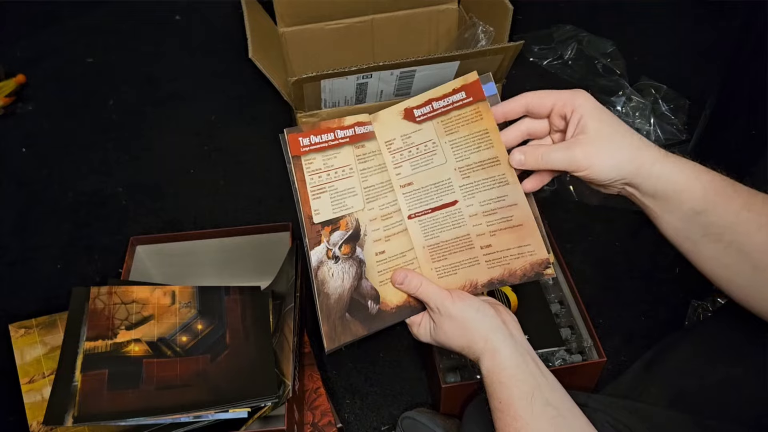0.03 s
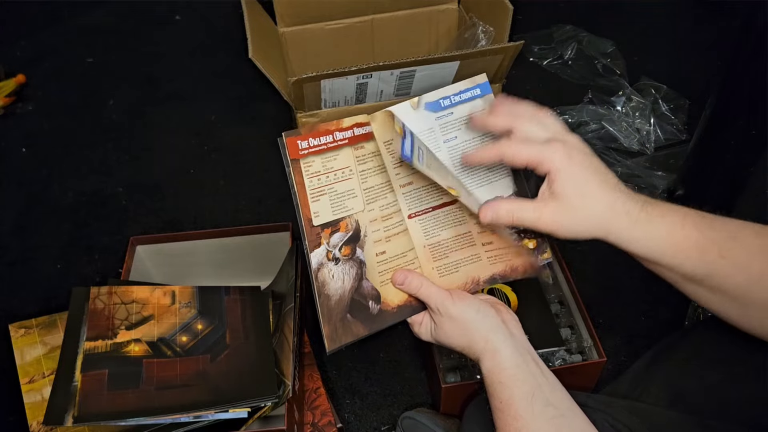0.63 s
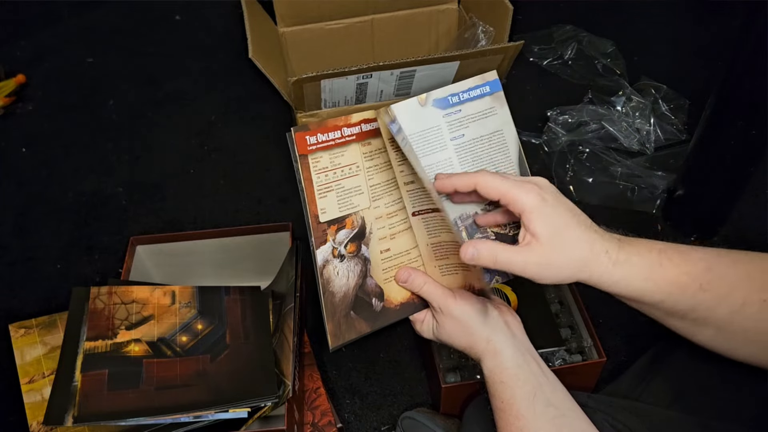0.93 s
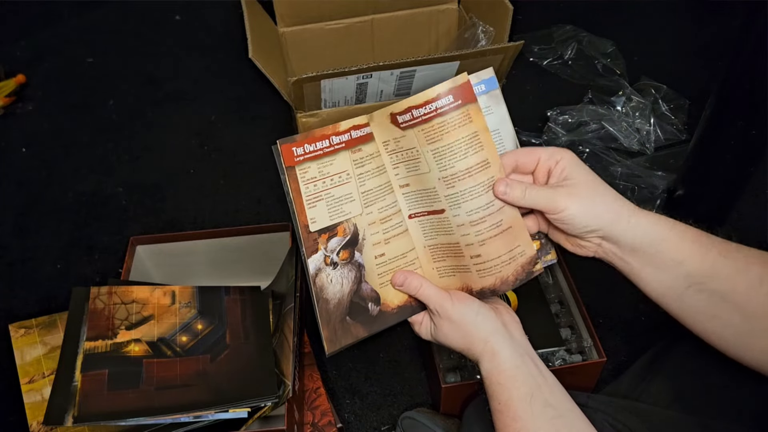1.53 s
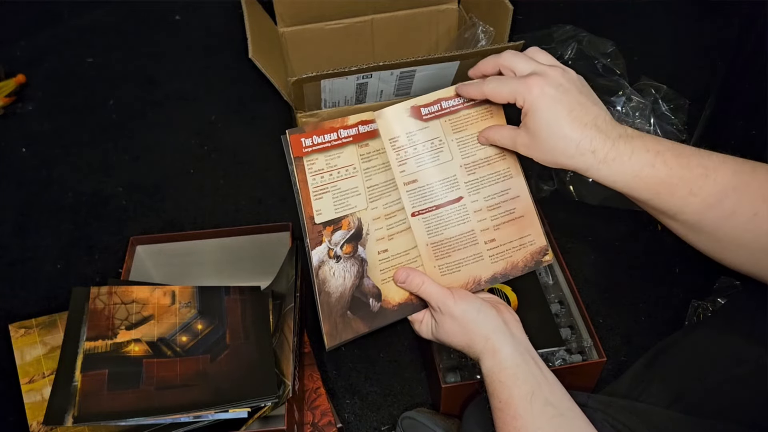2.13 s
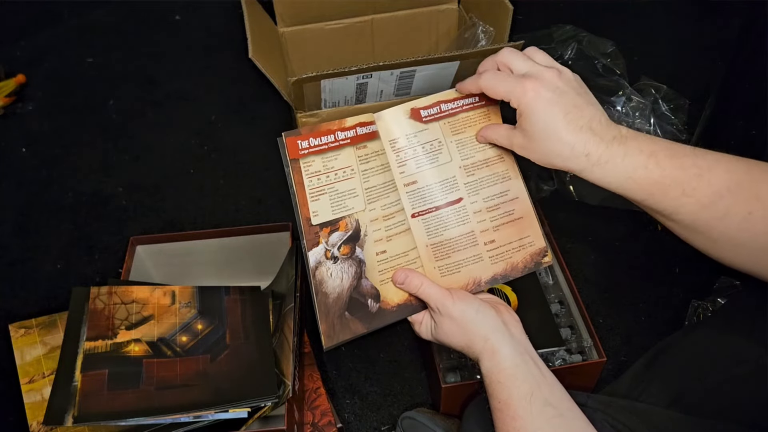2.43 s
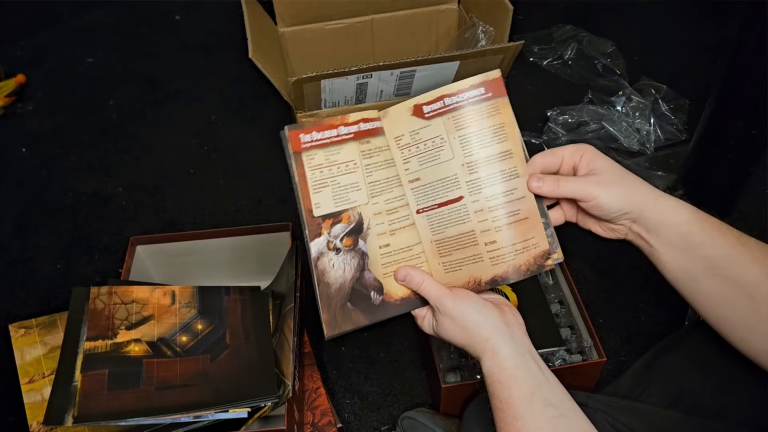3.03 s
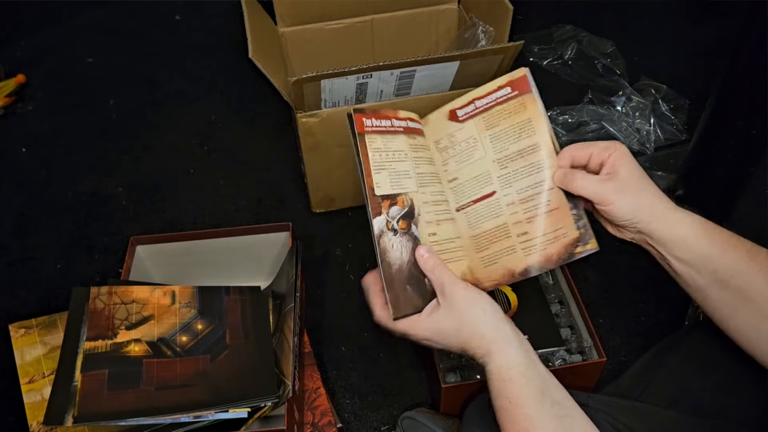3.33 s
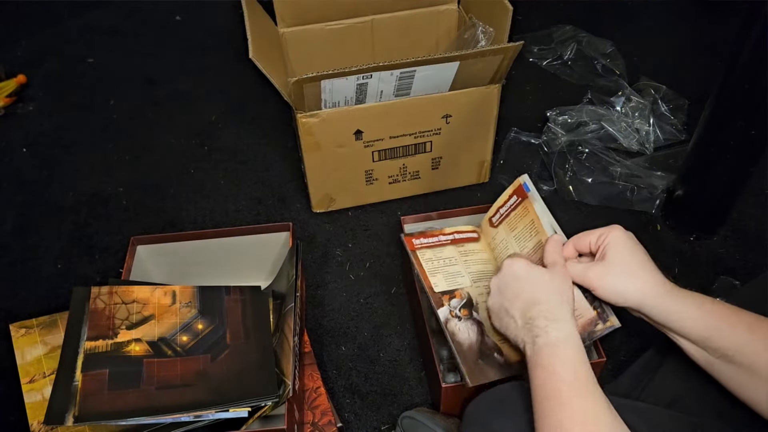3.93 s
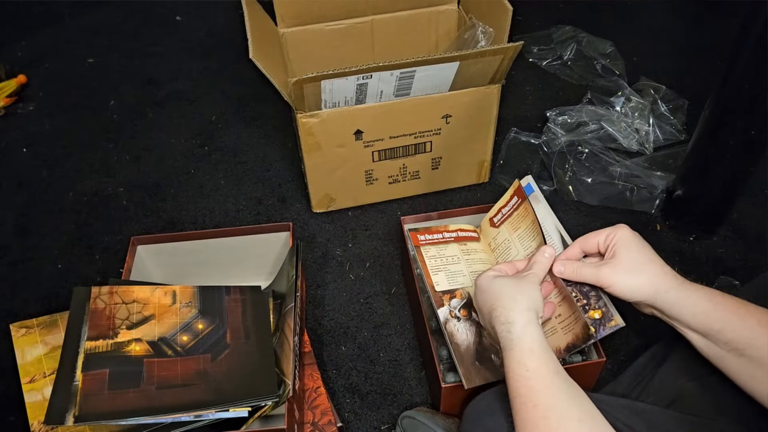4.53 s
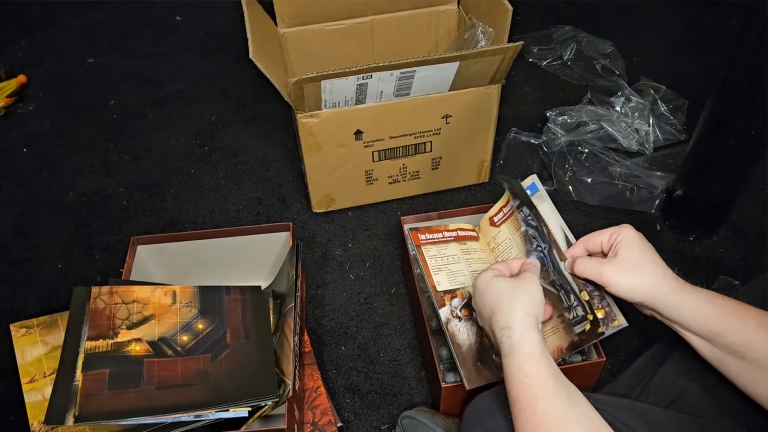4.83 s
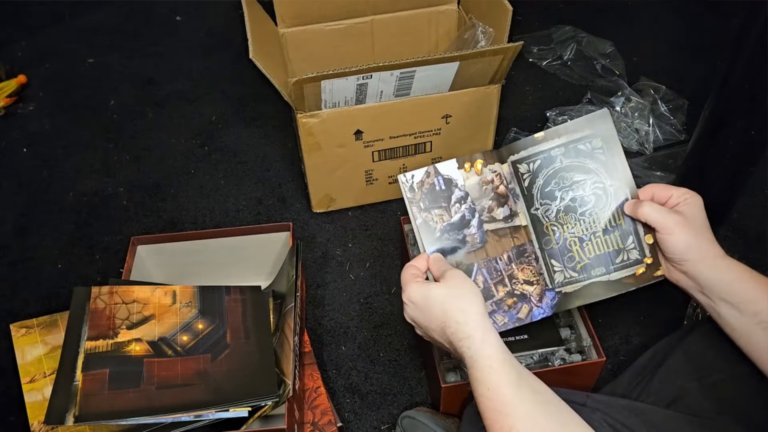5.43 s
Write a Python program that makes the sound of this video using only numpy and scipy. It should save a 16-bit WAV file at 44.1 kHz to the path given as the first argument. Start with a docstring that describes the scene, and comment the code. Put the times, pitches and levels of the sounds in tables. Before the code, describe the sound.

A low fan hum with a faint rush runs throughout in a small, quiet room. Close by, hands leaf through a glossy booklet. Soft rustles and finger slides begin at about 0.3 seconds, with a brighter crackle and a light knock near 0.8 seconds. More paper scrapes and brief swishes follow from 1.5 to 2.4 seconds, with small ticks as a fingertip catches a page corner. From about 2.8 to 3.5 seconds a thumb rubs dryly across the pages, with a few light taps. At 4 seconds the booklet bumps onto a box with a short, hollow double thud, slightly to the right. The paper rustles again, and at about 5.1 seconds a page flicks over with a sharp snap, the crispest sound of all. A few softer flaps and a small tick follow until about 5.6 seconds.

```python
"""Leafing through a booklet

A paperback booklet is leafed through over an open game box in a small quiet room. Fingers slide on
the glossy sheets, pages bend and crackle, the book bumps down and sets the box booming, and one page
flicks over sharply. Behind it a fan motor hums and beats slowly against the mains."""
import sys
import numpy as np
from scipy import signal
from scipy.fft import rfft, irfft, next_fast_len
from scipy.io import wavfile
from scipy.ndimage import map_coordinates

SR = 44100
rng = np.random.default_rng(int(sys.argv[2]) if len(sys.argv) > 2 else 0)


def generate_wav(signal):
    """Clip the signal to [-1, 1] and save it as 16-bit WAV at the path in sys.argv[1]."""
    frames = np.transpose(np.atleast_2d(signal))
    scaled = np.clip(frames, -1, 1) * 32767
    pcm = np.round(scaled).astype(np.int16)
    wavfile.write(sys.argv[1], SR, pcm)


N = 251087
TIME = np.arange(N) / SR


def from_db(db):
    return 10 ** (np.asarray(db) / 20)


def unit_rms(x):
    return x / np.sqrt(np.mean(x ** 2) + 1e-20)


def at_hz(points, hz):
    """Table lookup on a log-frequency axis."""
    known_hz, values = np.transpose(points)
    return np.interp(np.log(hz + 1), np.log(known_hz), values)


def butter(x, hz, kind, order=2):
    sos = signal.butter(order, np.clip(hz, 10, .45 * SR), kind, fs=SR, output="sos")
    return signal.sosfilt(sos, x)


def add(track, time_s, sound):
    start = round(time_s * SR)
    track[..., start:start + sound.shape[-1]] += sound[..., :N - start]


def stereo(pair, correlation):
    """Two independent signals mixed to a correlated left and right."""
    correlation = np.clip(correlation, -.99, .99)
    mid = np.sqrt(1 + correlation) * pair[0]
    side = np.sqrt(1 - correlation) * pair[1]
    return np.array([mid + side, mid - side])


def coloured(pair, spectrum):
    """Stereo signal shaped by a spectrum; unit rms."""
    size = next_fast_len(N)
    gain = from_db(at_hz(spectrum, np.fft.rfftfreq(size, 1 / SR)))
    return unit_rms(irfft(rfft(pair, size) * gain, size)[:, :N])


def drift(rate_hz):
    """Random line through unit-variance knots."""
    knots = rng.standard_normal(2000)
    return np.interp(TIME * rate_hz, np.arange(len(knots)), knots)


# fan off to the right: (frequency [Hz], left-right correlation [-1..1])
FAN_CORRELATION = [(60, 0.81), (130, 0.71), (290, 0.74), (640, 0.067), (1350, -0.75), (2400, 0.58),
                   (4400, -0.16), (15000, -0.37)]
def fan_stereo_noise(size):
    """White noise with the left-right correlation of a fan off to the right; also the room's tail."""
    correlation = at_hz(FAN_CORRELATION, np.fft.rfftfreq(size, 1 / SR))
    spectra = rfft(rng.standard_normal((2, size)))
    return unit_rms(irfft(stereo(spectra, correlation), size))


# motor hum: (shaft harmonic [1], rms level [dB])
MOTOR_HARMONICS = [(1, -68), (2, -53.5), (3, -53.5), (4, -68), (5, -62.5), (6, -66)]
# fan rush and hiss spectra: (frequency [Hz], relative level [dB])
RUSH_SPECTRUM = [(20, -37), (45, -14.5), (80, -8), (101, -3), (125, -0.5), (160, -4), (205, -1),
                 (225, -6.5), (255, -9), (285, -7), (315, -7.5), (345, -5), (430, -11), (480, -9),
                 (545, -4), (590, -10.5), (640, -8.5), (720, -13.5), (790, -7), (830, -19), (1050, -15),
                 (1700, -24)]
HISS_SPECTRUM = [(900, 15.5), (1500, 14), (2250, 17), (3200, -14), (4200, -9), (4600, 14.5), (5100, -6.5),
                 (6500, -3.5), (7200, 7), (8500, 4.5), (9500, -72), (16000, -53)]
def fan(shaft_hz, mains_hz, mains_db, rush_db, hiss_db, waver_db):
    """Rush, hiss and hum. The motor slips just behind the mains, so their second harmonics beat."""
    rad_per_hz = 2 * np.pi * (TIME - .01)
    hum = from_db(mains_db + 1.2 * drift(5)) * np.cos(2 * mains_hz * rad_per_hz)
    for harmonic, db in MOTOR_HARMONICS:
        wobble_rad = .05 * harmonic * drift(7)
        level = from_db(db + waver_db * drift(8.1))
        hum += level * np.cos(harmonic * shaft_hz * rad_per_hz + wobble_rad)
    rush = from_db(rush_db) * butter(coloured(fan_stereo_noise(N), RUSH_SPECTRUM), 1650, "low")
    hiss = from_db(hiss_db) * butter(coloured(fan_stereo_noise(N), HISS_SPECTRUM), 640, "high")
    return np.sqrt(2) * hum + rush + hiss


def hand_speed(peak_s, length_s):
    """A hand speeds up, holds briefly and slows down; 0 to 1."""
    flank_s = length_s * np.where(TIME < peak_s, 0.67, 0.69)
    distance = abs(TIME - peak_s) / flank_s
    return np.exp(-np.minimum(distance ** 2.6, 20))


def friction(spectrum, slips_per_s, spread_db, hiss, correlation):
    """Tiny random slips over an even hiss; unit rms."""
    slipping = rng.random(N) < slips_per_s / SR
    sizes = from_db(spread_db * np.minimum(rng.exponential(1, N), 4))
    noise = (unit_rms(slipping * sizes) + hiss) * rng.standard_normal((2, N))
    return coloured(stereo(noise, correlation), spectrum)


# hand strokes: (peak time [s], length [s], paper on paper [dB], skin on gloss [dB], flex re paper [dB])
STROKES = [(0.35, 0.11, -67.5, -78, -10), (0.582, 0.096, -62.5, -80, -13), (0.824, 0.1, -57, -68, -9),
           (0.96, 0.21, -65.5, -78.5, -9), (1.222, 0.096, -65.5, -79.5, -4),
           (1.595, 0.15, -61.5, -79, -0.5), (1.72, 0.067, -54, -63, -5), (1.878, 0.19, -61.5, -64.5, -16),
           (2.033, 0.17, -64.5, -85, -2.5), (2.245, 0.042, -60, -69, 0.5), (2.392, 0.16, -65, -79, -20),
           (2.827, 0.098, -58, -69.5, -11), (2.989, 0.18, -58.5, -65.5, -10), (3.303, 0.074, -64, -77, 1.5),
           (3.438, 0.073, -64.5, -57, -9), (3.527, 0.064, -72, -61, -3), (4.059, 0.12, -57, -64.5, 1.5),
           (4.25, 0.16, -62, -76.5, -6), (4.63, 0.03, -59.5, -69.5, -14), (4.978, 0.097, -56.5, -63, -0.5),
           (5.158, 0.13, -61, -64, 1), (5.322, 0.1, -63, -71, 2), (5.616, 0.096, -69.5, -75, 5)]
# bending sheet, scraping edge and sliding skin spectra: (frequency [Hz], relative level [dB])
RUSTLE_SPECTRUM = [(400, -3), (900, 1.5), (1400, 4), (2400, -6), (3500, -4), (6000, -15.5), (12000, -54)]
SCRAPE_SPECTRUM = [(1000, -19), (2200, 4.5), (3300, -1.5), (4200, 0), (5400, 2), (7500, -2), (9000, -2),
                   (11000, -87), (15000, -20)]
SLIDE_SPECTRUM = [(700, -25), (1500, -11), (3000, -4.5), (5500, -0.5), (8600, 1.5), (10000, -7),
                  (12000, 0.5), (15500, -4.5)]
def pages(rustle_gain_db, scrape_gain_db, slide_gain_db):
    """With each stroke, bending sheets rustle, their edges scrape and skin hisses over the gloss."""
    bend = paper = from_db(-70.5)   # floor: the book just being held
    skin = from_db(-89)
    for peak_s, length_s, paper_db, skin_db, flex_db in STROKES:
        speed = hand_speed(peak_s, length_s)
        bend = np.hypot(bend, from_db(paper_db + flex_db) * speed)
        paper = np.hypot(paper, from_db(paper_db) * speed)
        skin = np.hypot(skin, from_db(skin_db) * speed)
    rustle = friction(RUSTLE_SPECTRUM, slips_per_s=1500, spread_db=2, hiss=0.97, correlation=0.069)
    scrape = friction(SCRAPE_SPECTRUM, slips_per_s=600, spread_db=0, hiss=2.1, correlation=0.24)
    slide = friction(SLIDE_SPECTRUM, slips_per_s=3500, spread_db=1.5, hiss=1, correlation=0.083)
    rustle *= bend * from_db(rustle_gain_db + 3 * drift(50))
    scrape *= paper * from_db(scrape_gain_db + 3 * drift(70))
    slide *= skin * from_db(slide_gain_db + 1.9 * drift(41))
    return rustle + scrape + slide


# fingertip along an edge: (peak time [s], length [s], level [dB], pitch [Hz])
SWISHES = [(0.324, .03, -67, 2800), (0.821, .03, -65, 5260), (1.588, 0.032, -63, 3300),
           (1.706, 0.045, -60.5, 6170), (2.38, .025, -61, 5310), (2.824, .05, -64, 5500)]
def edge_swishes(width_hz, sink_oct_per_s):
    """A fingertip runs along an edge: a narrow hiss that sinks as more of the sheet comes free."""
    glides = [(peak_s + dt, hz * 2 ** (-sink_oct_per_s * dt))
              for peak_s, length_s, _, hz in SWISHES for dt in (-length_s, length_s)]
    centre_hz = np.interp(TIME, *np.transpose(glides))
    carrier = np.sqrt(2) * np.sin(2 * np.pi * np.cumsum(centre_hz) / SR)
    level = sum(from_db(db) * hand_speed(peak_s, length_s) for peak_s, length_s, db, _ in SWISHES)
    noise = stereo(rng.standard_normal((2, N)), 0.24)
    return level * unit_rms(butter(noise, width_hz / 2, "low")) * carrier


def fibre_crack(rise_s, shiver_s, low_hz, high_hz, correlation):
    """Fibres crack within one band, then the sheet shivers briefly; unit energy."""
    t = TIME[:2048]
    envelope = t / rise_s * np.exp(1 - t / rise_s) + from_db(-13) * np.exp(-t / shiver_s)
    crack = stereo(rng.standard_normal((2, len(t))), correlation) * envelope
    crack[:, round(rise_s * SR)] += from_db(18.5)   # one sharp break at the peak
    crack = butter(crack, [low_hz, high_hz], "band")
    crack = butter(crack, np.sqrt(low_hz * high_hz), "low", order=1)
    return crack / np.sqrt(np.sum(crack ** 2, axis=1, keepdims=True))


# book position, centre to right: (time [s], left channel lag [samples])
BOOK_POSITION = [(0, 0), (3.4, 0), (4, 1.2), (5.11, 1.2), (5.13, 2.2)]
def snap(time_s, rise_s, resonances, shiver_s, correlation, tilt_db_per_oct=0):
    """One crack per paper resonance, heard from where the book is."""
    out = 0
    for hz, width_oct, db in resonances:
        edge_ratio = 2 ** (np.clip(width_oct, .2, 3) / 2)
        level = from_db(db + tilt_db_per_oct * np.log2(hz / 5000))
        out = out + level * fibre_crack(rise_s, shiver_s, hz / edge_ratio, hz * edge_ratio, correlation)
    left, right = out
    lag_samples = np.interp(time_s, *np.transpose(BOOK_POSITION))
    return np.array([map_coordinates(left, [np.arange(len(left)) - lag_samples], order=5), right])


# sheet resonances: (centre [Hz], width [oct], level [dB])
SHEET_RESONANCES = [(670, 3.3, -13), (1540, 0.49, -11.5), (2780, 0.68, -2), (5630, 0.74, -0.5),
                    (8000, 0.31, -2), (12500, 0.27, -7), (15100, 0.24, -14)]
# sheet buckling: (time [s], relative level [dB], rise [s], tilt [dB/oct])
BUCKLES = [(0.36, -41.5, 0.002, -3.5), (3.3865, -37, 0.0009, -4), (3.5433, -40.5, 0.0037, 3),
           (5.005, -31, 0.007, -5), (5.022, -49, 0.0017, -2), (5.1095, -21, 0.00029, 1),
           (5.113, -29, 0.00033, 1), (5.1168, -37, 0.00061, -6.5), (5.1315, -15.5, 0.0011, 1),
           (5.1336, -10, 0.00053, 1), (5.138, -28, 0.0023, -4.5), (5.1435, -23, 0.00049, 4),
           (5.225, -34.5, 0.0021, -3), (5.306, -39, 0.0064, -5), (5.3151, -35.5, 0.0028, -5.5),
           (5.351, -44.5, 0.0054, -11), (5.492, -52.5, 0.00068, 7), (5.598, -32, 0.00062, 7.5)]
def sheet_buckles():
    """A sheet buckles over a wide band: fast in a crack, slowly in a flap."""
    out = np.zeros((2, N))
    for time_s, db, rise_s, tilt in BUCKLES:
        crack = snap(time_s, rise_s, SHEET_RESONANCES, shiver_s=.005, correlation=.5, tilt_db_per_oct=tilt)
        add(out, time_s, from_db(db) * crack)
    return out


# free corner resonances: (centre [Hz], width [oct], level [dB])
CORNER_RESONANCES = [(2000, 0.22, -7), (3530, 0.25, 0), (5150, 0.22, -8), (8400, 0.48, -17.5)]
# fingertip on a corner: (time [s], relative level [dB], rise [s], pitch [ratio])
CATCHES = [(0.394, -45.5, .001, 0.92), (0.5502, -42, 0.003, 0.93), (0.833, -34, .0005, 1.27),
           (0.8503, -34.5, 0.00052, 0.92), (0.8568, -41, 0.001, 1.05), (2.0703, -42.5, 0.0023, 0.92),
           (2.2426, -29, 0.00048, 0.99), (2.3834, -36, .0003, 1.03), (2.3877, -44, 0.00054, 0.94),
           (5.1266, -29, 0.00031, 1.64)]
def corner_ticks():
    """A fingertip catches a thin free corner; a shorter corner ticks higher."""
    out = np.zeros((2, N))
    for time_s, db, rise_s, pitch in CATCHES:
        corner = [(hz * pitch, width_oct, band_db) for hz, width_oct, band_db in CORNER_RESONANCES]
        add(out, time_s, from_db(db) * snap(time_s, rise_s, corner, shiver_s=.002, correlation=.5))
    return out


# thumb drags: (peak time [s], length [s], level [dB])
DRAGS = [(0.827, 0.022, -54.5), (1.857, 0.026, -60.5), (2.95, 0.035, -67), (3.09, .09, -62),
         (3.207, .04, -61), (3.265, 0.032, -59), (3.42, 0.032, -56), (3.952, 0.016, -58.5)]
# rubbed stack spectrum: (frequency [Hz], relative level [dB])
DRAG_SPECTRUM = [(600, -35), (1000, -2), (1450, 7), (1750, -3), (2100, -3), (2800, -9), (6000, -44)]
def thumb_drags():
    """The thumb sticks and slips across the stack of pages: a dry, hollow rub."""
    pressure = sum(from_db(db) * hand_speed(peak_s, length_s) for peak_s, length_s, db in DRAGS)
    return pressure * friction(DRAG_SPECTRUM, slips_per_s=350, spread_db=2, hiss=.5, correlation=.6)


# page stack resonances: (centre [Hz], width [oct], level [dB])
STACK_RESONANCES = [(870, 0.87, -7.5), (1330, 0.44, 1), (2380, 0.57, -5), (4650, 0.96, -19)]
# stack impacts: (time [s], relative level [dB], rise [s], tilt [dB/oct])
KNOCKS = [(0.8489, -26, 0.00121, 2.5), (0.872, -45, 0.0022, -4), (1.4674, -39.5, 0.00028, -5.5),
          (1.4758, -36, 0.0022, -3), (3.035, -34, 0.0023, 1.5), (3.2887, -23, 0.00024, 4.5),
          (3.9996, -21, 0.00027, 0), (4.1001, -16, 0.001685, 2.5)]
def stack_knocks():
    """The stiff stack of pages knocks dully against a finger or the box."""
    out = np.zeros((2, N))
    for time_s, db, rise_s, tilt in KNOCKS:
        knock = snap(time_s, rise_s, STACK_RESONANCES,
                     shiver_s=.005, correlation=.78, tilt_db_per_oct=tilt)
        add(out, time_s, from_db(db) * knock)
    return out


# box modes: (frequency [Hz], middle strike [dB], rim strike [dB], t60 [s])
BOX_MODES = [(146, -12.5, -14, 0.038), (193, -12, 2, 0.055), (270, 2.5, -5, 0.054), (333, 0.5, -19, 0.076),
             (444, -19, -9.5, 0.069), (559, -7.5, -9, 0.059), (730, -12, -16.5, 0.13), (858, -26, -7, 0.08),
             (1374, -16, -5, 0.028)]
# book landing and settling: (time [s], relative level [dB], tilt [dB/oct], position [0 middle..1 rim])
BUMPS = [(4.0207, -15.5, 1, 0.044), (4.0267, -20.5, -16, 0.079), (4.0378, -24, 2, 0), (4.102, -24, 4, 0.92),
         (4.1155, -25, 3.5, 0.79)]
def box_bumps(gain_db, contact_hz, lowest_hz):
    """The soft book booms on the middle and taps the drier rim; the small box radiates no deep bass."""
    t, out = TIME[:SR // 2], np.zeros(N)
    for time_s, db, tilt, position in BUMPS:
        for hz, middle_db, rim_db, t60_s in BOX_MODES:
            mode_db = np.interp(position, [0, 1], [middle_db, rim_db]) + tilt * np.log2(hz / 300)
            envelope = from_db(gain_db + db + mode_db - 60 * t / t60_s)
            add(out, time_s, envelope * np.sin(2 * np.pi * hz * t))
    return butter(butter(out, contact_hz, "low"), lowest_hz, "high", order=4)


def room(x, echo_s, echo_db, wet_db, t60_s, treble_t60_s):
    """A near reflection and a short tail, thin in the bass, whose treble dies first."""
    t = TIME[:16384]
    noise = butter(fan_stereo_noise(len(t)), 330, "high")
    dull = butter(noise, 3200, "low", order=1)
    tail = dull * from_db(-60 * t / t60_s) + (noise - dull) * from_db(-60 * t / treble_t60_s)
    tail *= np.clip(t / .006, 0, 1)
    response = from_db(wet_db) * tail / np.sqrt(np.sum(tail ** 2) / 2)
    response[:, round(echo_s * SR)] += from_db(echo_db)
    return x + signal.fftconvolve(x, response, axes=1)[:, :N]


def scene():
    book = pages(rustle_gain_db=1, scrape_gain_db=-4, slide_gain_db=3)
    book += thumb_drags() + edge_swishes(width_hz=1200, sink_oct_per_s=9)
    book += from_db(7.5) * (sheet_buckles() + corner_ticks() + stack_knocks())
    book += box_bumps(gain_db=-8, contact_hz=1160, lowest_hz=103)
    book = room(book, echo_s=.0072, echo_db=-14.5, wet_db=-5.5, t60_s=0.19, treble_t60_s=0.14)
    return book + fan(shaft_hz=58.98, mains_hz=60.02, mains_db=-48,
                      rush_db=-47.5, hiss_db=-63, waver_db=3)


def record(dry):
    """Steep low-pass at 15.8 kHz."""
    return signal.sosfilt(signal.ellip(10, .2, 80, 15800, fs=SR, output="sos"), dry)


dry = scene()
out = record(dry)
generate_wav(out)
```